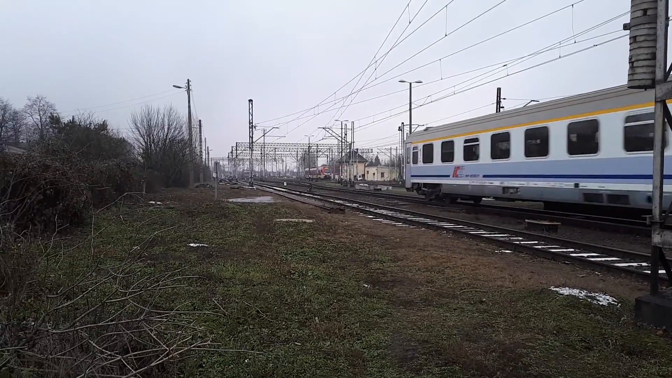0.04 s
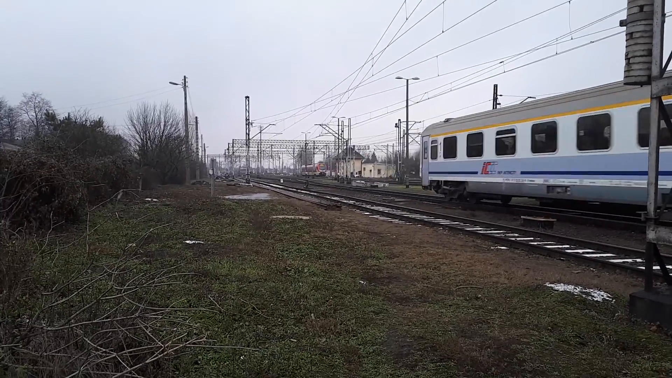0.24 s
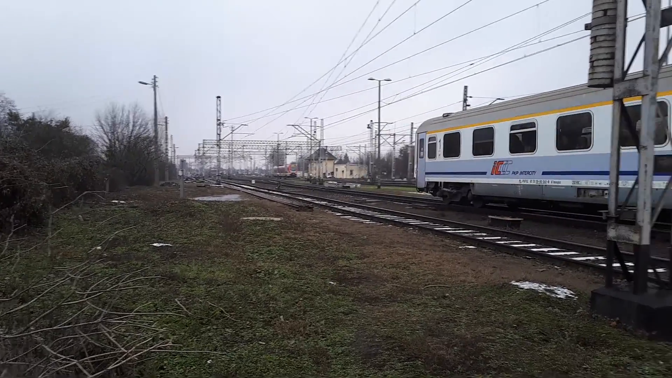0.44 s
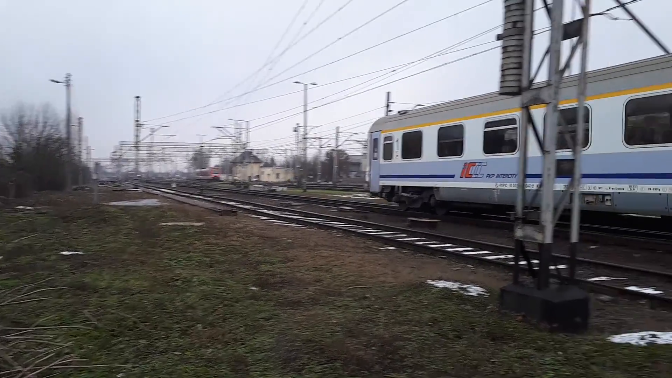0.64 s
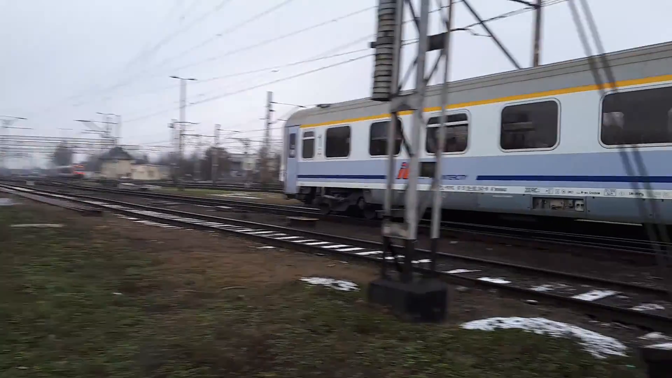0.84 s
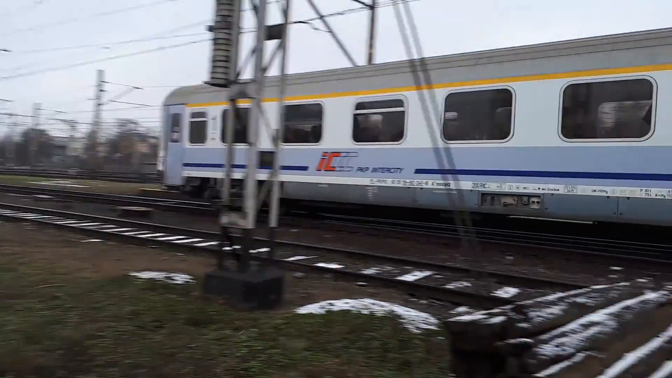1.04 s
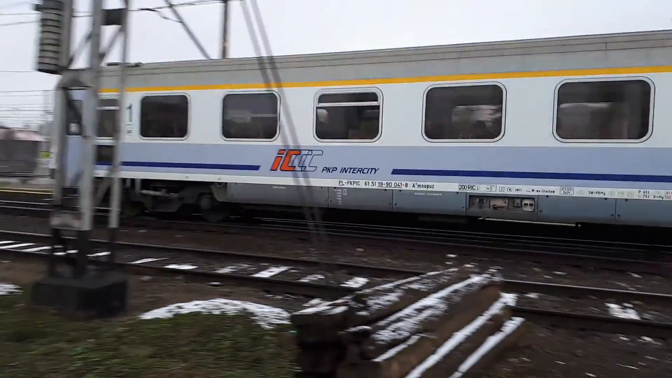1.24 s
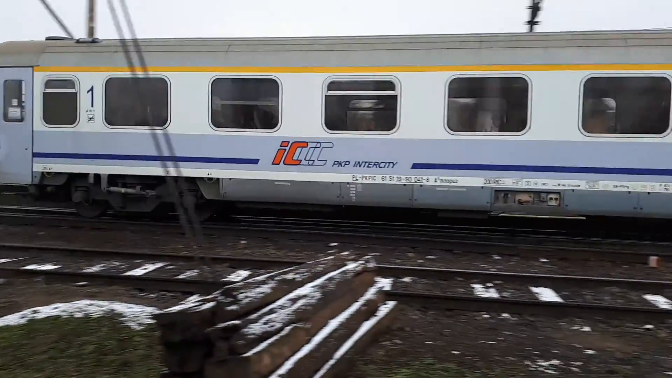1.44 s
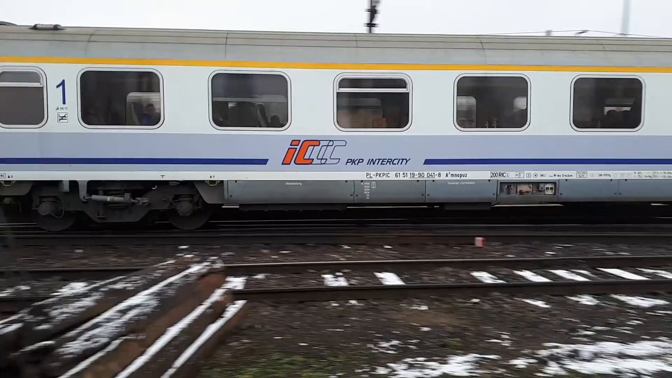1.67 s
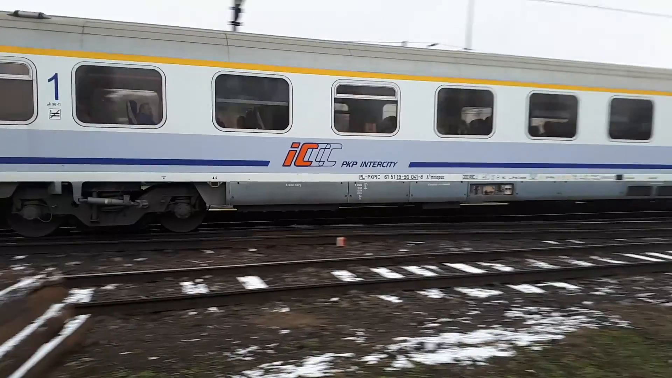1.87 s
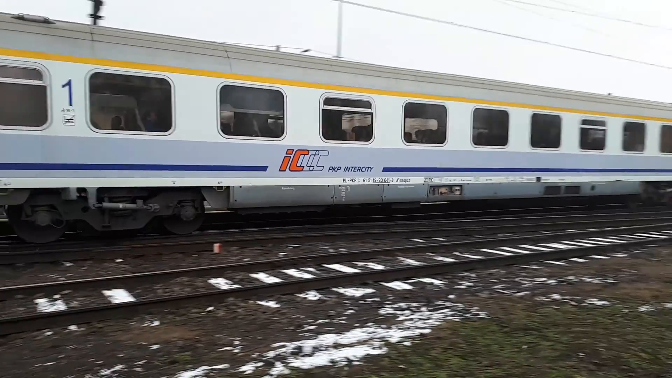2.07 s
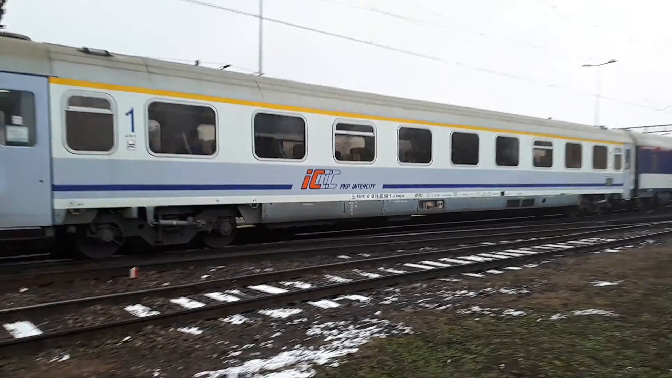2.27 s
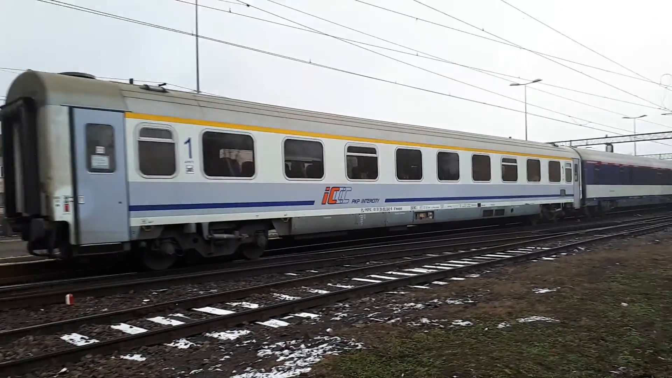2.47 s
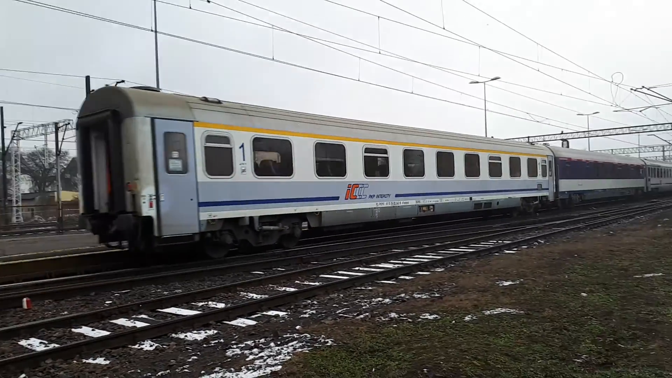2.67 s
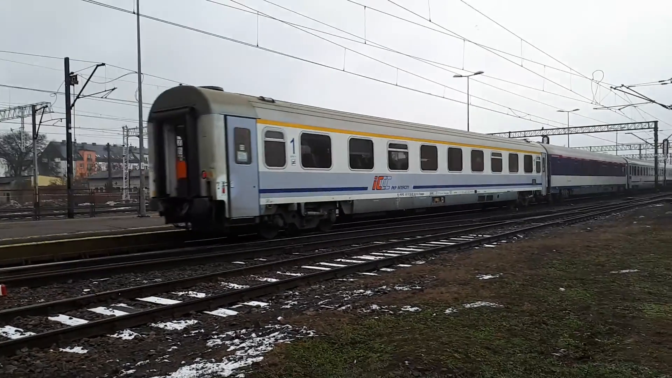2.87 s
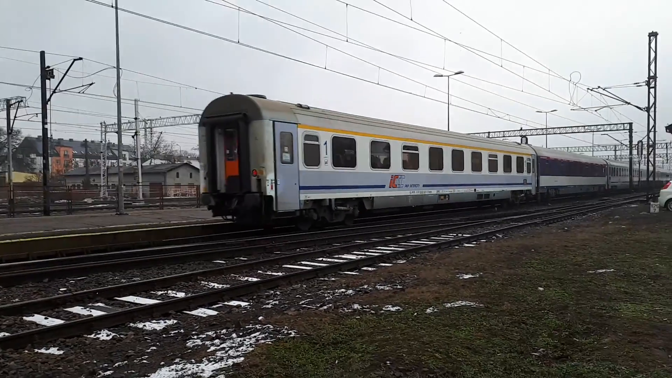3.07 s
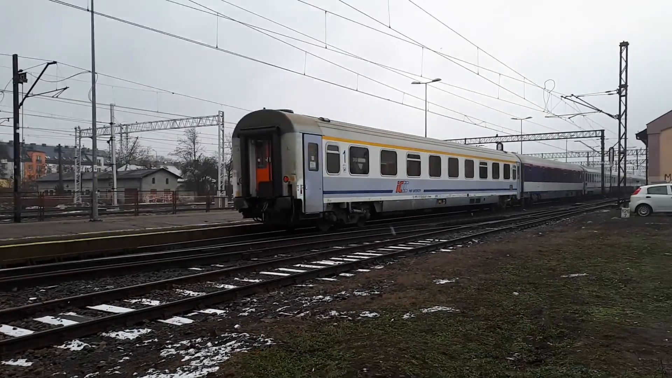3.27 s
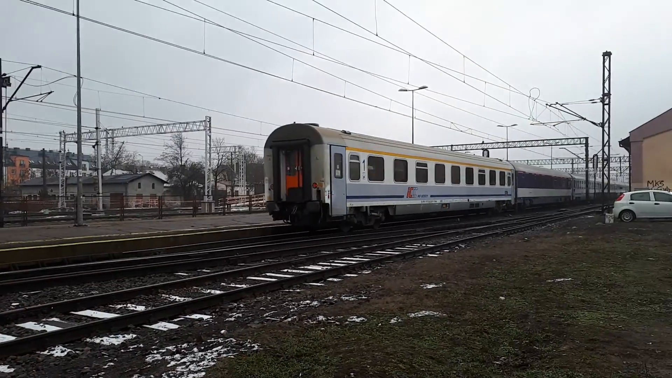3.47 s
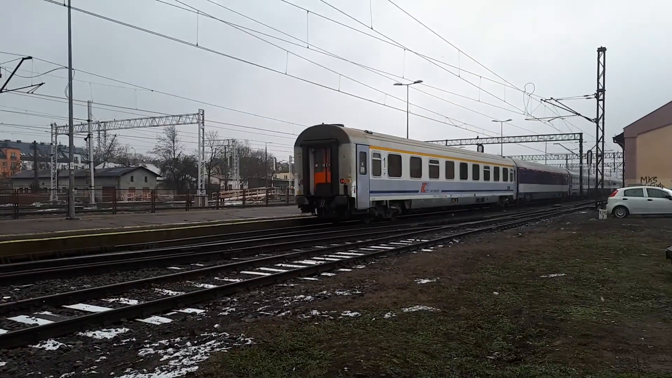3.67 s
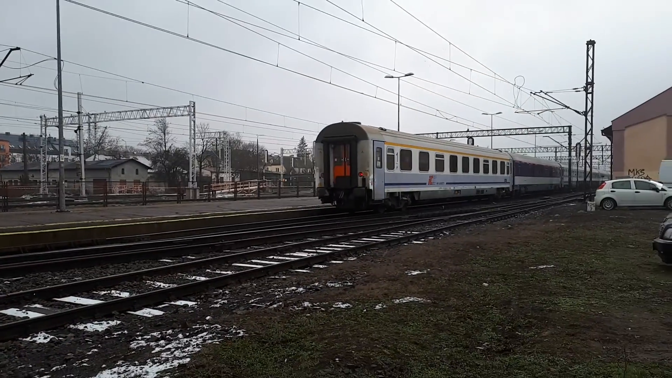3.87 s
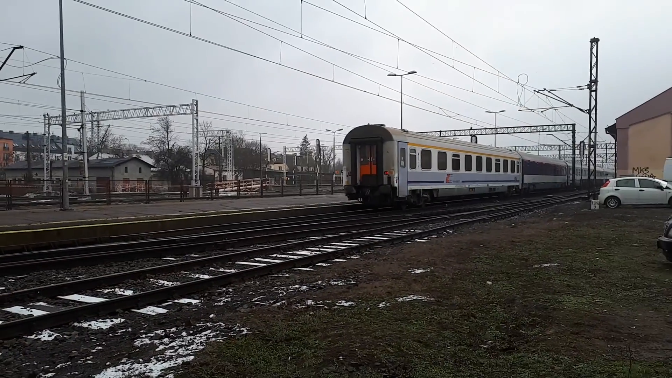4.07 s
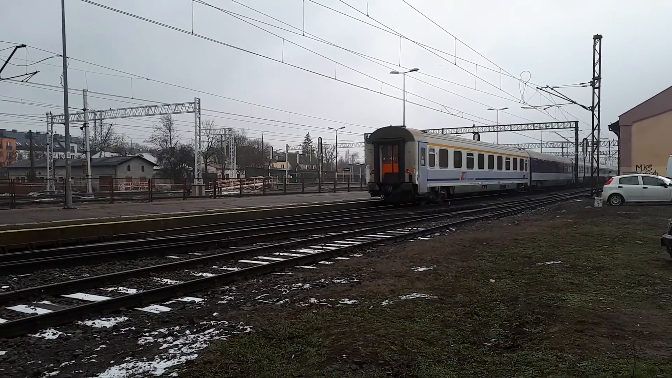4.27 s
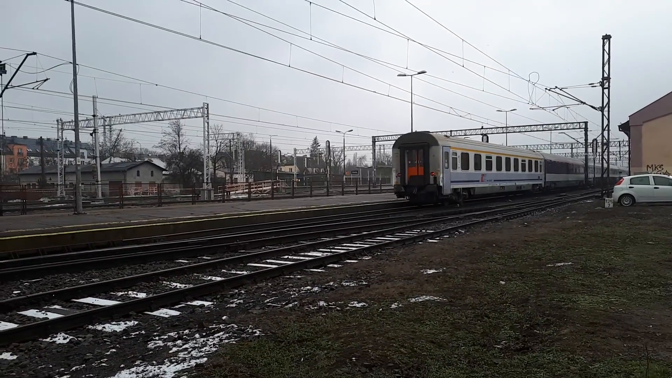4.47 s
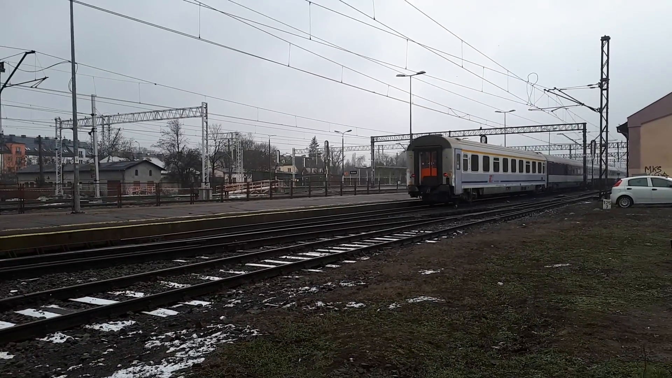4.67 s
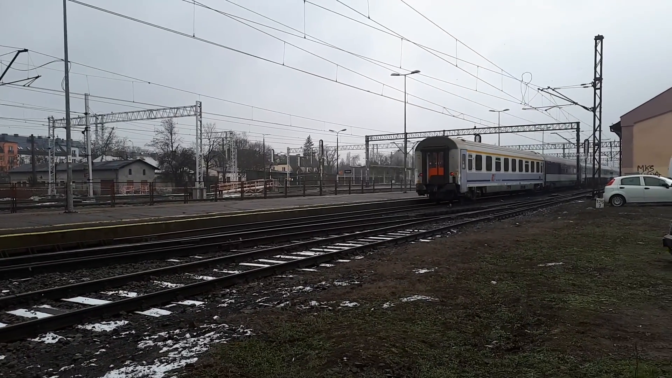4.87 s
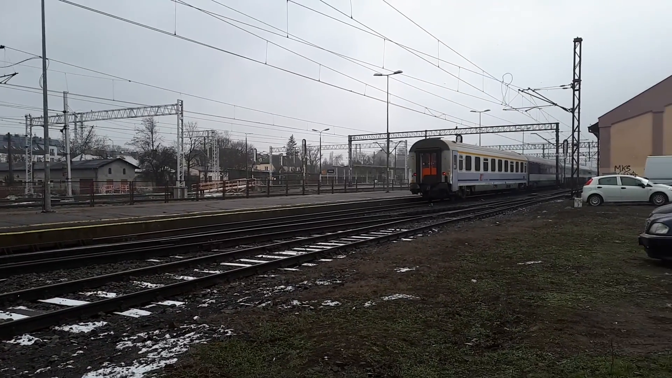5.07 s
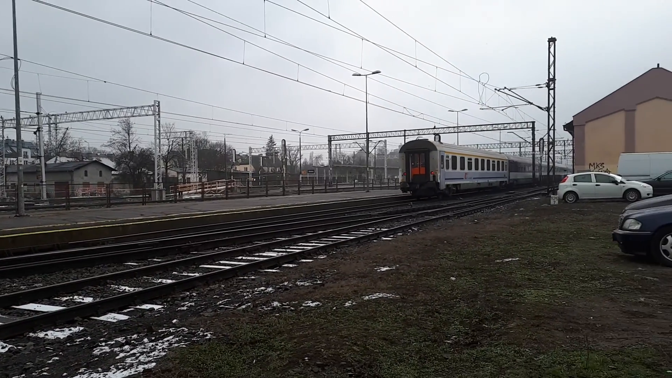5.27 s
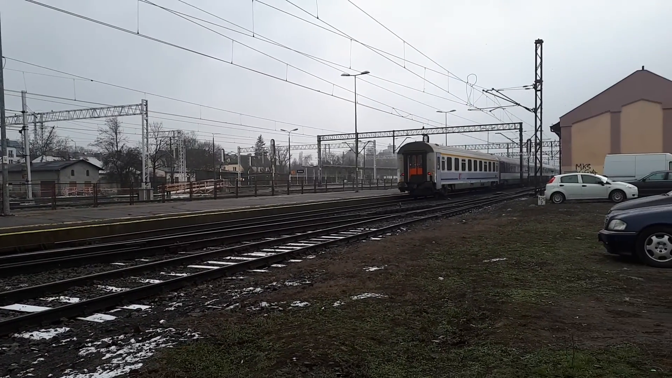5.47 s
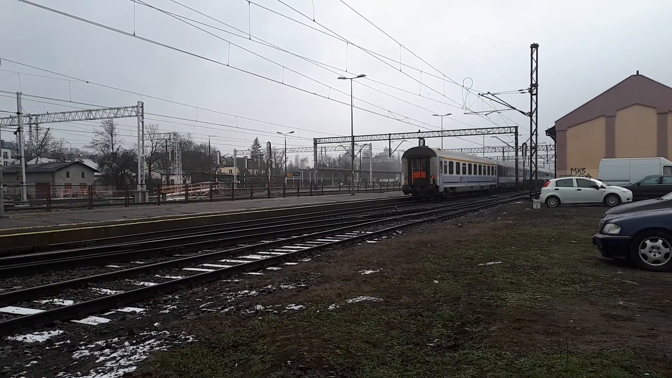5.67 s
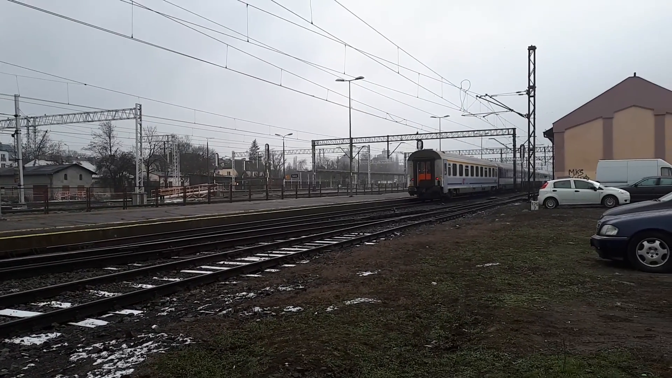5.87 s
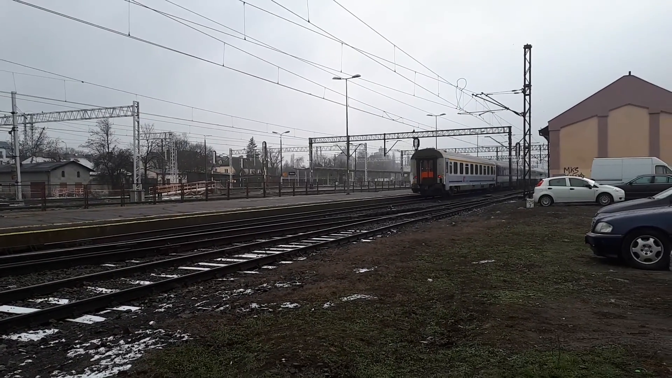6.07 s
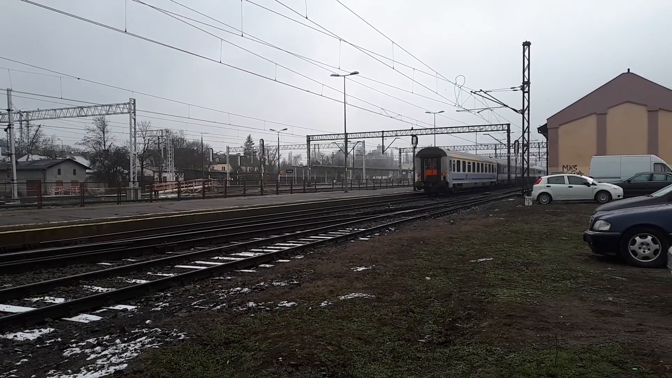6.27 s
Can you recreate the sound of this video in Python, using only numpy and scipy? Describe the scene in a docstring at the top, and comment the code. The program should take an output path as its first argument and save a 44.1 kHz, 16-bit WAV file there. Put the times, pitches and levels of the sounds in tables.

```python
"""Beside a railway track, the last coaches of a braking passenger train roll past a few metres away and recede.
Axles bang in pairs over rail joints and points: bursts of uneven impacts, shaped into thud, clack and clash.
Flange strikes set wheels ringing as decaying split modes; brief scrapes excite single high modes.
Between the blows, shaped noise makes the rumble and roar of rolling, and wavering tones the singing wheels.
Far off a rail hums over the low rumble of a town and the faint even hiss of two turning microphones."""
import sys
import numpy as np
from scipy import signal
from scipy.fft import rfft, irfft, next_fast_len
from scipy.io import wavfile
from scipy.ndimage import uniform_filter1d, map_coordinates

SR = 44100
rng = np.random.default_rng(int(sys.argv[2]) if len(sys.argv) > 2 else 0)


def transcribe(signal):
    """Save signal, clipped to [-1, 1], as a 16-bit WAV file at the path in sys.argv[1]."""
    frames = np.atleast_2d(signal).T
    limited = np.clip(frames, -1, 1)
    pcm = np.round(limited * 32767).astype(np.int16)
    wavfile.write(sys.argv[1], SR, pcm)


N = 278712
T = np.arange(N) / SR  # time in seconds

WHEELBASE_M = 2.5  # between the axles of a bogie
# Bogies crossing joints. Each row: first axle's start in seconds, thud level in dB, second axle's extra level
# in dB, hardness (level of the brighter parts) in dB, thud pitch in Hz, chatter time in seconds.
JOINT_CROSSINGS = [(-.056, -16.5, -0.5, 9, 284, 0.056), (0.172, -13.5, 0, -.5, 244, 0.026),
                   (.298, -19.5, -0.5, 7, 305, 0.018), (.673, -14.5, 1, 2, 234, 0.03),
                   (.739, -13, -0.5, -1.5, 329, 0.019), (1.262, -10.5, -1.4, 3.5, 247, 0.044),
                   (1.846, -22.5, -18, -14, 227, 0.024), (2.065, -11.5, -2, 1.5, 224, 0.027),
                   (2.435, -23.5, 3, -10.5, 226, 0.037), (2.717, -10.5, 0.5, -2.5, 243, 0.046),
                   (3.658, -35.5, 6, -7.5, 211, 0.019), (4.138, -34.5, -3, -11, 214, 0.043),
                   (5.419, -35.5, 4, 0.5, 192, 0.0088)]


def joints():
    """Delay by distance over speed: two axles hit a joint a wheelbase apart, so pairs spread under braking."""
    out = np.zeros((2, N + 2 * SR))  # one second spare at each end
    t = T[:SR // 2]
    for first_s, thud_db, second_db, hardness_db, thud_hz, chatter in JOINT_CROSSINGS:
        far = doublings(max(along(first_s, BOGIES[-1][0]), 0))
        second_s = first_s + WHEELBASE_M / speed(first_s)
        for when, level_db in [(first_s, thud_db), (second_s, thud_db + second_db)]:
            start = SR + int(when * SR)
            out[:, start:start + len(t)] += undb(level_db) * axle(t, thud_hz, hardness_db, far, chatter)
    return out[:, SR:SR + N]


# Levels against the thud at hardness zero, in dB.
CLACK_DB, CLASH_DB, SIZZLE_DB = -8, -13.5, -33.5
# Treble lost as the last bogie recedes, in dB per doubling of distance.
CLASH_LOSS_DB, SIZZLE_LOSS_DB = 1.1, 15
# Spectra of bogie and sleepers, of the rail, and of the wheel steel under a blow.
# Each row: frequency in Hz (scaled by track stiffness for the first two), relative level in dB.
THUD_SPECTRUM = [(30, -46), (60, -21), (105, -18.5), (170, 0.5), (235, 6.5), (290, 1.5), (350, -4.5),
                 (440, -15.5), (650, -33)]
CLACK_SPECTRUM = [(300, 1.5), (480, 4.5), (700, 5), (950, 4), (1300, -8), (1750, 1.5), (2100, -17.5),
                  (3200, -6)]
CLASH_SPECTRUM = [(1300, 7), (1900, 6.5), (2500, 2), (3400, -0.5), (4400, 4), (5200, -14), (7200, -15.5),
                  (8400, -38)]


def axle(t, thud_hz, hardness_db, far, chatter):
    """Impact excitation: one blow thuds in bogie and sleepers, clacks in the rail, clashes in wheel steel."""
    stiffness = thud_hz / THUD_SPECTRUM[4][0]  # firmer track raises thud and clack together
    body = [(hz * stiffness, db) for hz, db in THUD_SPECTRUM]
    rail = [(hz * stiffness ** .5, db) for hz, db in CLACK_SPECTRUM]
    clash_db = CLASH_DB - CLASH_LOSS_DB * far
    sizzle_db = SIZZLE_DB - SIZZLE_LOSS_DB * far
    thud = blow(t, body, chatter, rise=0.0016, t60=0.21, grain_db=2.0, patchy_db=0.5)
    clack = undb(CLACK_DB) * blow(
        t, rail, 0.59 * chatter, rise=0.0021, t60=0.21, grain_db=3.5, patchy_db=4.0)
    clash = undb(clash_db) * blow(
        t, CLASH_SPECTRUM, 0.54 * chatter, rise=0.0012, t60=0.34, grain_db=-0.5, patchy_db=5.5)
    sizzle = undb(sizzle_db) * blow(
        t, HISS_SPECTRUM, 0.91 * chatter, rise=0.0017, t60=0.25, grain_db=3.5, patchy_db=5.5)
    # the wheel rebounds every 10 ms or so; each landing knocks afresh until it settles
    since_landing = (t * rng.uniform(70, 120)) % 1  # share of one rebound
    knocks = undb(-1.7 * since_landing)
    settling = 1 + (knocks - 1) * np.exp(-t / 0.05)
    return thud + undb(hardness_db) * (clack + clash + sizzle) * settling


def blow(t, spectrum, chatter, rise, t60, grain_db, patchy_db):
    """Repeated impact: a wheel chatters on the rail, a burst of uneven impacts that holds, then dies."""
    grains = np.repeat(rng.standard_normal(len(t)), 64)[:len(t)]
    impacts = rng.standard_normal((2, len(t))) * undb(grain_db * grains)
    # each point of contact favours its own resonances
    burst = colour(steel(impacts, spacing_hz=75.1, depth_db=patchy_db), spectrum)
    # the burst is levelled, so its chatter stays steady until it dies away
    burst /= np.sqrt(uniform_filter1d(burst ** 2, size=500) + 1e-9)
    attack = 1 - np.exp(-t / rise)
    decay = undb(-60 * np.maximum(t - chatter, 0) / t60)
    return burst * attack * decay


# Spectra of rolling, from low to high. Each row: frequency in Hz, relative level in dB.
RUMBLE_SPECTRUM = [(25, -44), (45, -40), (65, -18), (105, -11.5), (150, -3.5), (200, -4.5), (232, 4),
                   (275, -5.5), (335, -3), (410, -16.5), (560, -22.5)]
ROAR_SPECTRUM = [(330, -1), (460, -4.5), (600, 2.5), (850, 2.5), (1050, -1.5), (1280, -9), (1650, 4.5),
                 (2100, -13.5)]
RUSH_SPECTRUM = [(1300, -39), (1700, -1), (1980, 0), (2300, 1.5), (3000, 0.5), (4000, 0.5), (4550, -4),
                 (5100, -15.5), (6000, -20), (7200, -18), (8200, -33)]
HISS_SPECTRUM = [(4800, -47), (6000, 1), (7300, 5), (8500, -13), (10000, -0.5), (11500, -1.5), (13000, 3.5),
                 (15800, -4)]
# Rail resonances. Each row: frequency in Hz, half width in Hz, relative level in dB.
RAIL_RESONANCES = [(1610, 190, -4.5), (2214, 62, 9.5), (2700, 74, 6), (3234, 170, 1), (3860, 170, -1.5),
                   (4460, 130, -3.5)]


def rolling():
    """Roughness excitation: treads shake bogies, rails and wheels; the load wavers as the coaches rock."""
    load = walk(18)
    rumble = colour(noise(), RUMBLE_SPECTRUM) * undb(0.33 * load)
    rumble *= passing(near_db=-27.5, loss_db=10.0, tread_share=0.45)

    roar = colour(noise(), ROAR_SPECTRUM) * undb(0.43 * load + 1.56 * walk(30))
    roar *= passing(near_db=-38, loss_db=8.0, tread_share=0.34)

    rush = colour(steel(noise(), spacing_hz=54.5, depth_db=4.5), RUSH_SPECTRUM) * undb(1.1 * walk(35))
    rush *= passing(near_db=-39.5, loss_db=9.0, tread_share=0.72)

    hiss = colour(steel(noise(), spacing_hz=55, depth_db=2.8), HISS_SPECTRUM)
    hiss *= passing(near_db=-63, loss_db=14.5, tread_share=1.28)

    # the rail resonances come forward from 2.4 to 3.2 s, then fade with distance
    forward_db = np.interp(T, [2.4, 3.2], [-11, -3.5])
    rails = resonate(noise(), RAIL_RESONANCES) * undb(forward_db)
    rails *= passing(near_db=-34.5, loss_db=10.0, tread_share=0.79)
    return rumble + roar + rush + hiss + rails


# Flange strikes. Each row: start in seconds, level in dB, wheel number,
# brightness in dB per octave, level of the splash of hiss in dB.
FLANGE_STRIKES = [(0.172, -12.5, 0, -9, -50), (0.341, -14.5, 0, -16.5, -55), (0.852, -12.5, 1, -3, -38.5),
                  (2.261, -21.5, 2, -3.5, -51)]
# Modes of three wheels, one list per wheel. Each row: frequency in Hz, relative level in dB, t60 in seconds.
WHEEL_MODES = [
    [(1777, -9.5, 0.28), (2100, -5, 0.16), (2230, -9.5, 0.44), (2663, -3, 0.28), (2773, -4, 0.52),
     (2886, -13, 0.35), (3129, -15, 0.2), (3311, -18, 0.33), (3620, -13.5, 1), (3770, -15, 0.7),
     (3950, -15, 1), (4570, -22, .7)],
    [(2230, -17.5, 0.63), (2696, -10.5, 0.42), (2770, -4, 0.35), (3080, -4.5, 0.22), (3280, -1, 0.26),
     (3970, -25, .6), (5840, -26, 0.19), (6560, -20, 0.25), (6540, -20, 0.21), (7460, -20, 0.27)],
    [(1631, -3.5, 0.62), (2783, 2.5, 0.54), (3140, -3, 0.32), (3324, -1.5, 0.68), (3500, -16, 0.6),
     (4020, -6, 0.87), (4861, -19.5, 0.98), (6100, -20, 0.73), (6640, -17, 0.61), (7050, -14.5, 0.58)],
]


def strikes():
    """Modal ringing: a flange hits the points, the wheel rings like a bell; turning splits modes in pairs."""
    out = np.zeros((2, N + SR))
    t = T[:SR]
    contact = 1 - np.exp(-t / .0007)
    for s, level_db, number, tilt_db, splash_db in FLANGE_STRIKES:
        start = int(s * SR)
        splash = blow(t, HISS_SPECTRUM, 0.054, rise=0.0013, t60=0.48, grain_db=2, patchy_db=1)
        out[:, start:start + SR] += undb(splash_db) * splash
        for hz, mode_db, t60 in WHEEL_MODES[int(round(number))]:
            split_hz, phase = rng.uniform(1.3, 24.4), rng.uniform(0, 2 * np.pi)
            beating = 1 + 0.53 * np.exp(2j * np.pi * split_hz * t)
            pair = np.exp(1j * (2 * np.pi * hz * t + phase)) * beating
            decay = np.exp(-np.log(1000) * t / t60)
            gain = undb(level_db + mode_db + tilt_db * np.log2(hz / 2750))
            ring = pair * contact * decay * gain
            out[:, start:start + SR] += [ring.imag, 0.37 * ring.real]  # direct, scattered
    return out[:, :N]


# Wheel modes kept singing by tread roughness. Each row: frequency at rest in Hz, relative level in dB.
SINGING_MODES = [(1630, 1.5), (2250, -5.5), (2740, -1.5), (2980, -11), (3590, 1.5), (3930, 0.5), (4217, -3),
                 (4795, -18), (4940, -13.5), (5700, -13.5), (6650, -13)]


def singing():
    """Doppler effect: wheel modes sink in pitch as the last bogie passes, and dull with its distance."""
    past = along(T, BOGIES[-1][0])
    doppler = 1 - speed(T) / 343 * past / np.hypot(past, TRACK_M)  # sound travels at 343 m/s
    tilt_db = -2.5 - 7 * doublings(past)  # per octave above 4 kHz
    modes = np.zeros((2, N))
    for hz, db in SINGING_MODES:
        gain = undb(db + tilt_db * np.log2(max(hz / 4000, 1)))
        modes += tone(hz * doppler, waver_db=4.0, wander_hz=13.08) * gain
    return modes * passing(near_db=-56, loss_db=9.0, tread_share=1.01)


SCRAPE_WIDTH_HZ = 34  # half width of the excited mode
# Flanges scraping the rail head. Each row: loudest moment in seconds, half length in seconds,
# level in dB, pitch in Hz.
FLANGE_SCRAPES = [(.01, 0.07, -32.5, 3510), (0.248, 0.049, -28, 4290), (0.396, .04, -27.5, 4280),
                  (.4, 0.053, -25.5, 2730), (0.486, .02, -28.5, 3430), (0.783, 0.018, -37, 4250),
                  (0.93, 0.022, -34, 4360), (1.96, .08, -56, 6690), (1.96, 0.057, -55, 5830),
                  (2.18, .035, -40, 3670), (2.772, 0.013, -42, 4500), (2.964, 0.014, -29, 4345)]


def scrapes():
    """Friction excitation: a flange rubs the rail for an instant and one high wheel mode swells."""
    out = np.zeros((2, N))
    for s, length, db, hz in FLANGE_SCRAPES:
        near = np.abs(T - s) < .25
        rub = resonate(rng.standard_normal((2, near.sum())), [(hz, SCRAPE_WIDTH_HZ, 0)])
        out[:, near] += rub * undb(db) * swell(T[near], s, length)
    return out


# Swells of the hum from the track under the distant wheels.
# Each row: loudest moment in seconds, half length in seconds, level in dB.
RAIL_HUM_SWELLS = [(3.797, 0.18, -48.5), (4.39, 0.074, -53.5), (4.734, 0.12, -49), (5.6, 1, -56)]


def rail_hum():
    """Sustained resonance: a mid tone swells and fades in the track under the receding wheels."""
    swells = sum(undb(db) * swell(T, s, length) for s, length, db in RAIL_HUM_SWELLS)
    return tone(691, waver_db=3.0, wander_hz=5.18) * swells


# Spectrum of distant traffic. Each row: frequency in Hz, relative level in dB.
TOWN_SPECTRUM = [(22, -36), (42, -6), (70, 0), (110, 0), (180, -7), (400, -24)]


def town():
    """Stationary noise: a steady low rumble of distant traffic."""
    return colour(noise(), TOWN_SPECTRUM) * undb(-49.5)


def microphone_hiss():
    """Noise floor: the faint even hiss of the microphones."""
    return colour(noise(), HISS_SPECTRUM) * undb(-86)


# Speed at time zero in m/s, speed lost each second in m/s, distance from track to microphone in metres.
START_SPEED, BRAKING, TRACK_M = 14.72, .91, 9


def speed(s):
    """Uniform deceleration: speed of the train in m/s."""
    return START_SPEED - BRAKING * s


def along(s, nearest_s):
    """Mean speed times time: metres that a bogie has rolled past the microphone."""
    return (s - nearest_s) * speed((s + nearest_s) / 2)


def doublings(metres):
    """Distance law: how often the distance has doubled, that far along the track."""
    return np.log2(np.hypot(metres, TRACK_M) / TRACK_M)


# Bogies going by. Each row: nearest moment in seconds, relative level in dB, extra tread roughness in dB.
BOGIES = [(.33, -0.5, 9), (.95, -1, 2.5), (2.38, -.5, 2)]


def passing(near_db, loss_db, tread_share):
    """Energy summation: bogie powers add, each losing loss_db per doubling of its distance."""
    power = 0
    for nearest_s, db, tread_db in BOGIES:
        distance_db = loss_db * doublings(along(T, nearest_s))
        power = power + undb(near_db + db + tread_share * tread_db - distance_db) ** 2
    return np.sqrt(power)


def steel(x, spacing_hz, depth_db):
    """Modal density: steel has a dense, irregular forest of resonances."""
    peaks_db = depth_db * rng.standard_normal(size=400)
    return filtered(x, lambda hz: undb(np.interp(hz / spacing_hz, np.arange(len(peaks_db)), peaks_db)))


def tone(hz, waver_db, wander_hz):
    """Self-sustained mode: roughness keeps a line wavering in level and pitch, direct and scattered."""
    phase = 2 * np.pi * np.cumsum(hz + wander_hz * walk(40)) / SR
    level = np.sqrt(2) * undb(waver_db * walk(22.12))
    return np.sin([phase, phase + 2 * walk(6.7)]) * level


def swell(t, s, length):
    """Gaussian envelope: a bell-shaped rise and fall around time s."""
    return np.exp(-.5 * ((t - s) / length) ** 2)


def noise():
    """Incoherence: two unrelated noises, one for the direct sound and one for the scattered."""
    return rng.standard_normal((2, N))


def walk(rate):
    """Slow random modulation: levels held 1 / rate s and slewed twice; spread near 1."""
    k = int(SR / rate)
    held = np.repeat(rng.standard_normal(N // k + 1), k)
    return 1.3 * uniform_filter1d(uniform_filter1d(held, k), k)[:N]


def colour(x, points):
    """Spectral shaping: give x a spectrum that falls steeply beyond its ends; rms 1."""
    lo, hi = points[0][0], points[-1][0]
    closed = [(lo / 2, points[0][1] - 50), *points, (hi * 2, points[-1][1] - 70)]
    return unit(filtered(x, lambda hz: response(closed, hz)))


def resonate(x, modes):
    """Modal superposition: ring (Hz, half width Hz, dB) resonances with steep skirts; rms 1."""
    def gain(hz):
        return sum(undb(db) / (1 + 1j * (hz - f) / width) ** 2 for f, width, db in modes)
    return unit(filtered(x, gain))


def filtered(x, gain):
    """Linear filtering: multiply the spectrum by a gain that is a function of frequency."""
    size = next_fast_len(x.shape[-1])
    spectrum = rfft(x, size) * gain(np.fft.rfftfreq(size, 1 / SR))
    return irfft(spectrum, size)[..., :x.shape[-1]]


def response(points, hz):
    """Frequency response: gain of a (Hz, dB) spectrum, interpolated over log frequency."""
    f, db = np.transpose(points)
    return undb(np.interp(np.log(hz + 1), np.log(f), db))


def unit(x):
    """Root-mean-square normalisation: scale each row to rms 1."""
    return x / np.sqrt(np.mean(x ** 2, axis=-1, keepdims=True))


def undb(db):
    """Logarithmic level: decibels to gain."""
    return np.exp(np.asarray(db) * (np.log(10) / 20))


# Bearing of the nearest bogie from the turning microphones.
# Each row: time in seconds, lag of the right ear in ms.
BEARING_LAGS = [(0, -0.29), (.9, -0.43), (1.3, 0.13), (1.5, 0.26), (2.9, 0.16), (3.5, -0.016),
                (6.32, 0.023)]
# Sound scattered by ballast and coach sides. Each row: frequency in Hz, level against direct sound in dB.
SCATTER_RESPONSE = [(60, -21), (250, -17), (450, -6), (800, -7), (1500, -6.5), (4000, -3), (12000, 3)]
BASS_HZ, BASS_LAG_SHARE = 427, 0.36  # upper edge of the track's bass, its share of the lag


def scene():
    """Interaural delay: direct sound lags between the ears with the bearing; scattered sound widens it."""
    lag_s, lag_ms = np.transpose(BEARING_LAGS)
    lag = np.interp(T, lag_s, lag_ms) * SR / 1000  # in samples
    train = joints() + rolling() + strikes() + singing() + scrapes() + rail_hum()
    direct, scattered = train + town() + microphone_hiss()
    side = filtered(scattered, lambda hz: response(SCATTER_RESPONSE, hz))
    # the bass spreads along the track, so its bearing is less marked
    bass = filtered(direct - side, lambda hz: 1 / (1 + (hz / BASS_HZ) ** 6))
    upper = direct - side - bass
    right = np.zeros(N)
    for part, delay in [(bass, BASS_LAG_SHARE * lag), (upper, lag)]:
        right += map_coordinates(part, [np.arange(N) - delay], order=3, mode="nearest")
    return np.array([direct + side, right])


TOP_HZ = 15800  # upper limit of the microphones
# Left minus right sensitivity of the microphones. Each row: frequency in Hz, difference in dB.
PORT_DIFFERENCE = [(100, -.5), (250, 0), (450, 1), (900, 3), (1700, 3), (2500, 2), (4400, -2.5),
                   (5000, 5.5), (5700, 14.5), (7200, 23), (8500, 10), (10000, 11.5), (15000, 21.5)]


def record(dry):
    """Transducer response: the right microphone is deaf to high treble; peaks are capped, the top cut."""
    def ports(hz):
        ratio = response(PORT_DIFFERENCE, hz)
        return 2 * np.array([ratio, np.ones_like(ratio)]) / (1 + ratio)
    capped = np.clip(filtered(dry, ports), -1, 1)
    top_cut = signal.ellip(10, .2, 80, TOP_HZ, fs=SR, output="sos")
    return signal.sosfilt(top_cut, capped)


dry = scene()
out = record(dry)
transcribe(out)
```